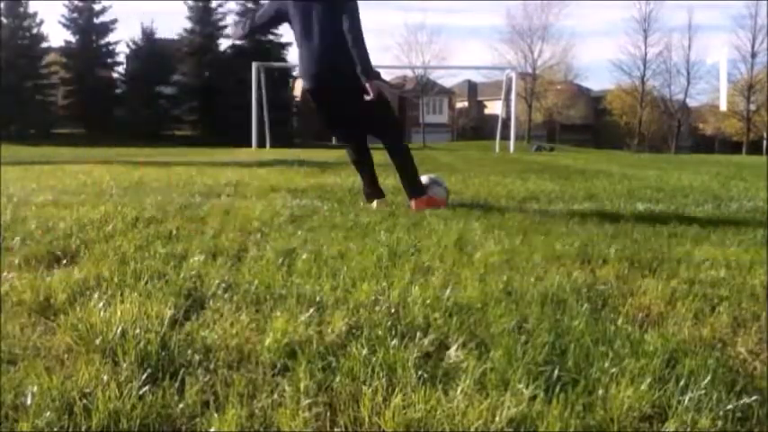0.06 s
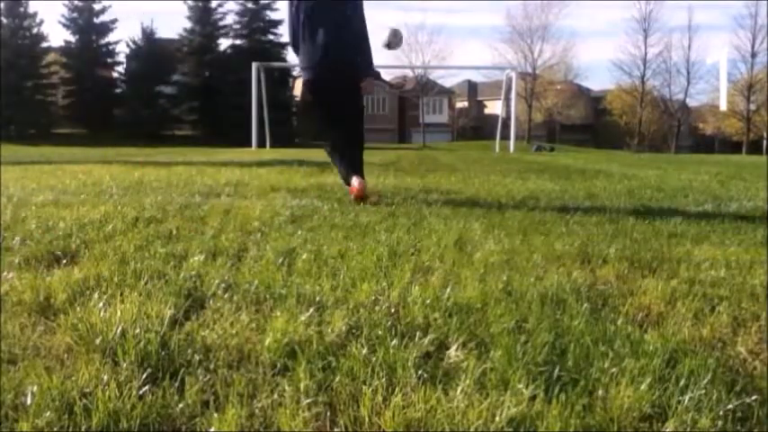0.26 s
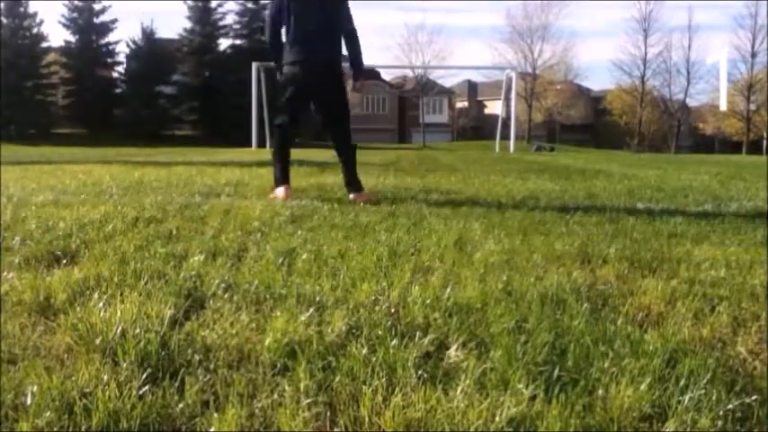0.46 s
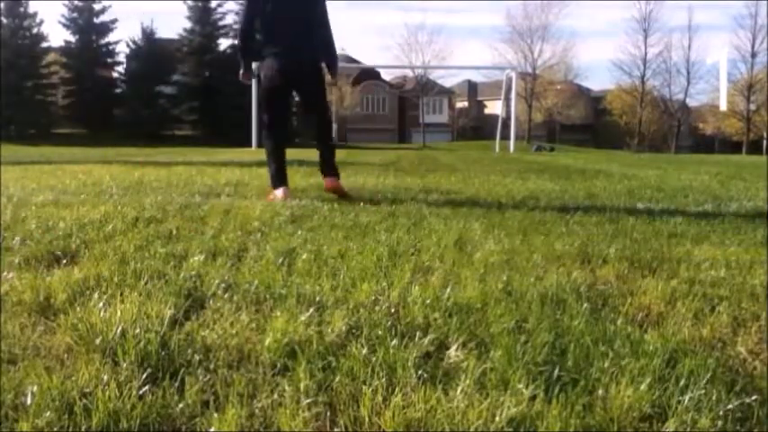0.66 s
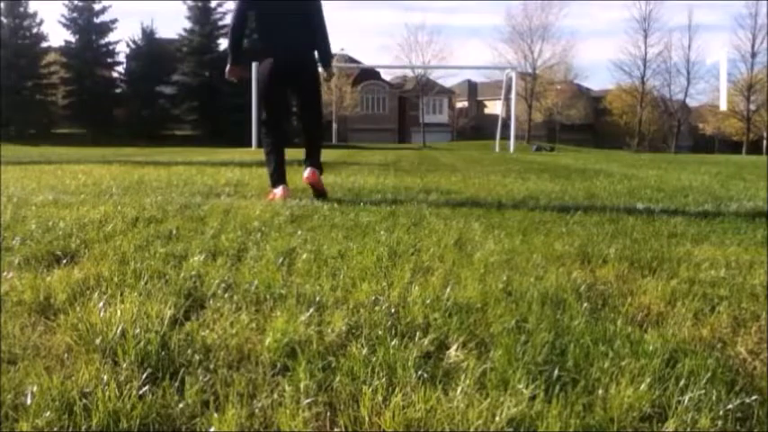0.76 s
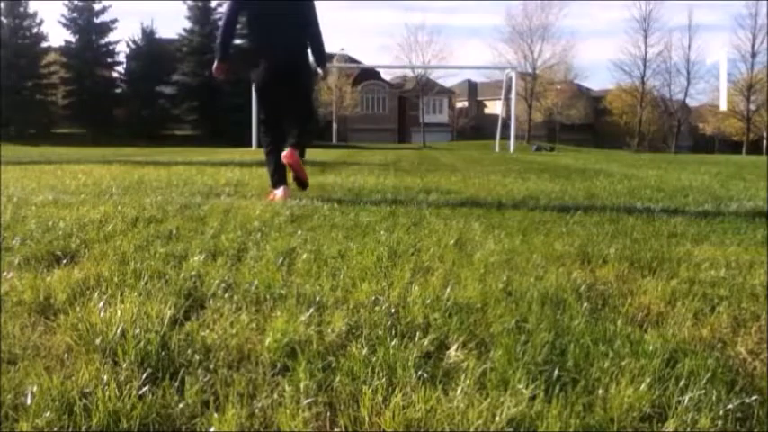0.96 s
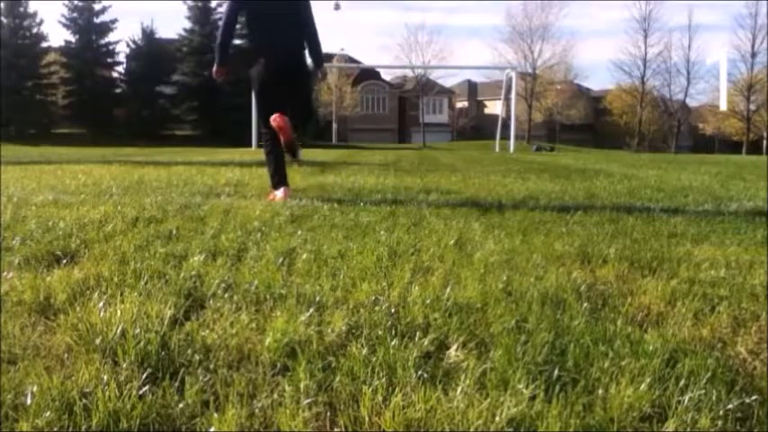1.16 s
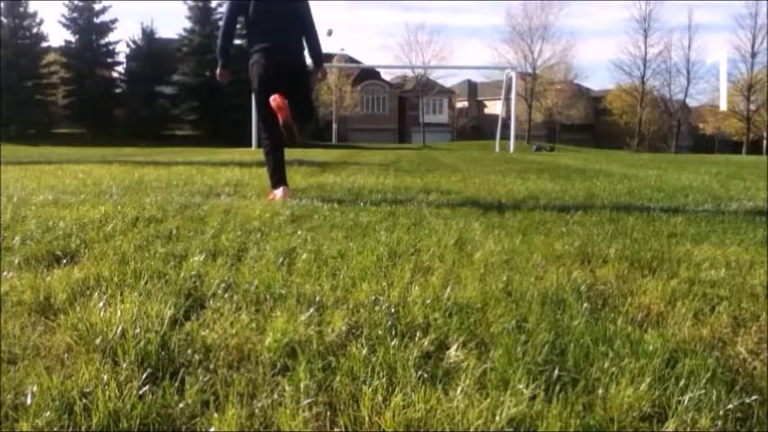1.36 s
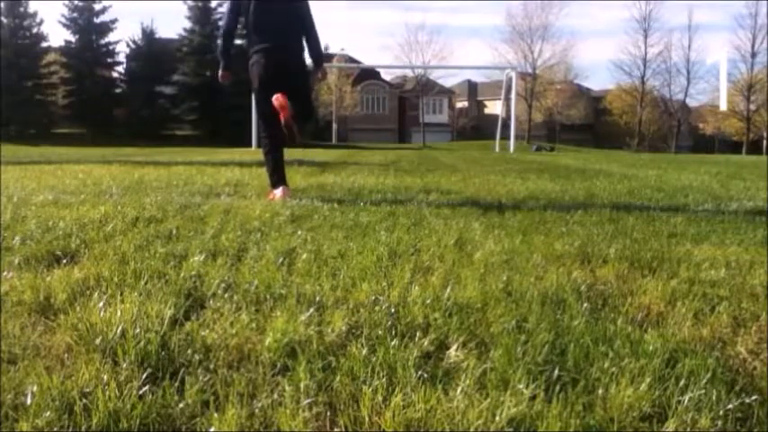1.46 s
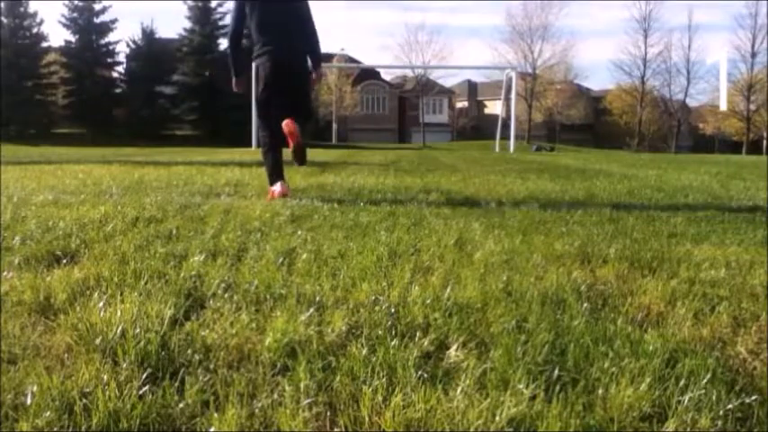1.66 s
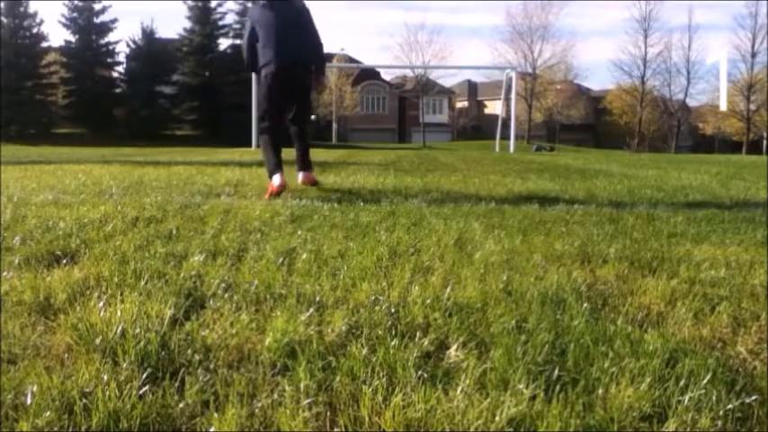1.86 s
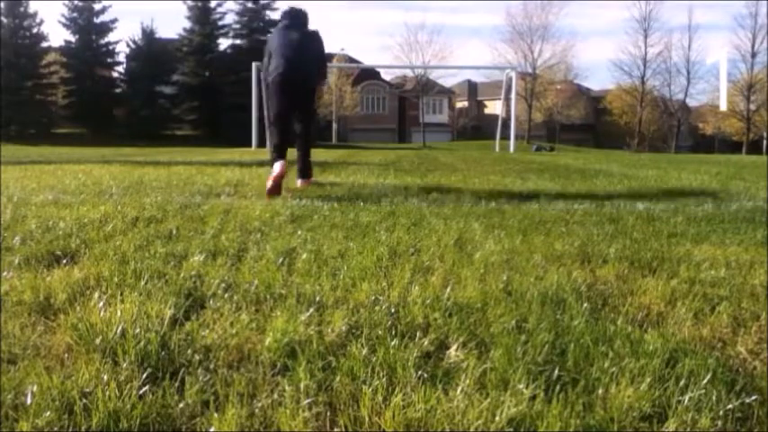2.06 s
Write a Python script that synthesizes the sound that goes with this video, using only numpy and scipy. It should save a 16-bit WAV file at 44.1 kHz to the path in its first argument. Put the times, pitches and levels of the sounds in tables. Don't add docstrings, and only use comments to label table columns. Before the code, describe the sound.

Single hard football kick on an open grassy field, followed by low fluttering wind gusts.

```python
import sys
import numpy as np
from scipy import signal
from scipy.fft import rfft, irfft
from scipy.io import wavfile

SR = 44100
rng = np.random.default_rng(int(sys.argv[2]) if len(sys.argv) > 2 else 0)


def decibels_to_gain(level_db):
    exponent = np.asarray(level_db, float) / 20
    return 10 ** exponent


def store_wav(level_fs):
    pcm = np.round(np.clip(np.atleast_2d(level_fs), -1, 1) * 32767)
    wavfile.write(sys.argv[1], SR, pcm.T.astype(np.int16))


N = 92610

# (start [s], length [s], level [dB], brightness [Hz])
BRUSHES = [
    (-.05, 0.24, -76.5, 10600),
    (0.088, 0.036, -71, 5360),
    (0.1, 0.0087, -63, 5200),
    (0.207, 0.034, -54.5, 2200),
    (0.214, 0.016, -62.5, 7040),
    (0.303, 0.0097, -80, 5900),
    (0.576, 0.048, -68, 3530),
    (0.628, 0.016, -78.5, 3500),
    (2.016, 0.052, -73.5, 2550),
]
# (time [s], level [dB], pitch [Hz])
STALKS = [
    (.1045, -52, 3300),
    (.209, -39, 1200),
    (.582, -53, 1600),
    (.598, -56, 1500),
    (.623, -54, 1600),
    (.646, -52, 2000),
    (1.99, -55, 3300),
    (2.0455, -52, 1600),
]
BLADES_PER_S, STALK_S = 9200, .0015
# (frequency [Hz], density [dB per Hz])
HUSH_SPECTRUM = [(100, -0.5), (250, -2), (500, -6), (1000, -15), (2000, -17.5), (4000, -25.5), (8000, -28),
                 (15000, -32.5)]
HUSH_DB, HUSH_PATCHY_DB = -73, .7
# (end [s], pitch [Hz], level [dB])
ENGINE = (0.27, 487, -70)

# (start [s], length [s], level [dB rms], eddy pitch [Hz])
GUSTS = [(0.023, 0.022, -54, 104), (.05, .05, -64, 100), (0.091, 0.044, -54, 147),
         (0.275, 0.029, -61.5, 115), (0.317, .055, -54.5, 248.8), (.526, 0.023, -58, 170),
         (0.555, 0.041, -51, 150.6), (.705, 0.066, -48, 262.5), (0.787, 0.038, -64.5, 116),
         (0.821, 0.088, -48, 261), (.964, 0.035, -55, 221), (1.003, .02, -54.5, 261),
         (1.035, .05, -50, 240.9), (1.143, 0.055, -57.5, 199), (1.291, 0.034, -59, 100),
         (1.364, 0.047, -56.5, 180), (1.95, 0.045, -64, 119), (0.376, 0.069, -62.5, 130.2)]
# (time [s], peak [dB], pitch [Hz])
POPS = [(0.0682, -39.5, 85), (0.1029, -41.6, 151), (0.1235, -41.5, 109), (0.2084, -40.5, 139),
        (0.328, -45.5, 210), (0.3365, -43, 235), (0.3608, -40, 175), (0.3701, -41, 130), (0.5707, -42, 128),
        (0.6879, -38.5, 108), (0.7073, -43, 83.4), (0.7091, -29.5, 310), (0.718, -31.5, 126),
        (0.732, -37, 210), (0.7445, -38.5, 137), (0.7498, -46.5, 250), (0.7536, -36, 292),
        (0.7655, -45, 126), (0.7802, -39.5, 118), (0.7989, -42.5, 90), (0.8359, -33, 253),
        (0.8426, -35.5, 210), (0.8483, -47.5, 84), (0.8513, -27.5, 165), (0.8573, -34, 195),
        (0.8639, -39, 228), (0.8693, -36, 258), (0.8767, -29, 232), (0.8896, -43, 85), (0.8922, -31, 210),
        (0.9003, -41, 193), (0.9163, -34, 288), (0.9203, -23, 249), (0.9223, -39, 494), (0.9254, -36, 164),
        (0.9324, -41, 92), (0.941, -45, 180), (0.9591, -41, 128), (0.9693, -43, 193), (0.9734, -31, 176),
        (0.9771, -35.5, 84), (0.9825, -33.9, 224), (0.9903, -31, 99), (0.9952, -45, 178),
        (1.0086, -32.5, 430), (1.0115, -26.5, 178), (1.0157, -46.5, 86), (1.0179, -30.5, 240),
        (1.0415, -31.5, 178), (1.0458, -36, 248), (1.0502, -28.5, 120), (1.0567, -42, 246),
        (1.0705, -28.5, 208), (1.0783, -51, 139), (1.0814, -34.5, 298), (1.1563, -42.5, 151),
        (1.1699, -43.6, 138), (1.179, -32.5, 164), (1.1839, -40, 173), (1.4075, -38, 149)]
# (time [s], peak [dB], pitch [Hz])
WISPS = [(0.03, -49.5, 107), (0.171, -49, 170), (.18, -46.5, 148), (0.3242, -45.5, 364), (0.353, -48, 360),
         (.7215, -35.5, 333), (0.7417, -40.5, 295), (.826, -41.5, 372), (0.832, -46, 303),
         (.888, -36.5, 260), (0.912, -44, 382), (.992, -46, 403), (1.15, -45, 196), (1.19, -46, 176),
         (1.195, -50, 178), (1.221, -45.5, 149), (1.232, -49, 239), (1.245, -47.5, 99), (1.261, -50.5, 113),
         (1.365, -54.5, 220), (1.389, -45.5, 235), (1.428, -43.5, 116), (1.552, -50.5, 107),
         (1.566, -50, 123), (1.8476, -38, 159)]
# (time [s], peak [dB], pitch [Hz])
CRACKLES = [(.7075, -41.5, 500), (0.712, -48, 610), (.732, -54, 620), (.756, -51, 560), (.868, -52.5, 555),
            (.8755, -45.5, 470), (0.9189, -35.5, 550), (.9925, -47, 560), (1.018, -48.5, 540),
            (1.046, -58, 500), (1.0676, -47.5, 470), (1.0812, -48.5, 620), (1.177, -51, 436),
            (.337, -52, 550), (.366, -52, 520), (.325, -52.5, 600), (1.844, -48, 330), (0.8504, -39, 396)]
# (time [s], level [dB])
BREEZE = [(0.0, -71), (0.2, -64.5), (0.42, -63.5), (0.55, -60.5), (0.67, -65.5), (0.88, -63.5),
          (1.1, -63.5), (1.32, -66), (1.58, -68.5), (1.8, -67.5), (2.1, -62)]
EDDIES_PER_CYCLE, EDDY_CYCLES, EDDY_SPREAD_OCT, EDDY_SPREAD_DB = 1.05, 0.53, 0.4, 5
EDDY_TILT_DB_PER_OCT, GUST_EDGE_S = -11, .005
BREEZE_HZ, BREEZE_LUMP_DB = 170, 2
RUMBLE_DB, RUMBLE_HZ, MIC_CUT_HZ = -70, 68, 62

# (pitch [Hz], level [dB], t60 [s])
PANELS = [(559, -35, 0.011), (1110, -46.5, 0.0067), (830, -46.5, 0.017), (1428, -43.5, 0.015),
          (1930, -53, .02), (2880, -26.5, 0.0035), (4340, -36, 0.0059), (5010, -37, 0.0057),
          (5820, -42.5, 0.0097), (8000, -44.5, 0.005), (12100, -48, 0.0029)]
# (delay [s], level [dB], highest mode reached [Hz])
SNAPS = [
    (.00019, 0, 16000),
    (.0016, -11, 16000),
    (.0033, 3, 1500),
    (.0146, 3, 700),
]
# (pitch [Hz], level [dB], t60 [s])
FLIGHT = [(3009, -72, 1.2), (3034, -76, .5), (3402, -65, .15), (2286, -64, .2), (4673, -67, .15),
          (2810, -69, .16), (3973, -68, .15)]
# (pitch [Hz], level [dB])
BUZZ = [(1100, -45), (1590, -75), (1850, -50), (2092, -60), (2362, -52), (4102, -62), (4452, -56),
        (5206, -50.5), (5437, -64), (6016, -52), (6190, -63), (6480, -52.5), (6880, -55), (7171, -46)]
KICK_S = .23058
SLAP_DB, SLAP_LEAD_S, SLAP_S = -29, .0001, .0008
SQUASH_HZ, SQUASH_DB, SQUASH_HOLD_S = 114, -26.5, 0.016
BUZZ_S, BUZZ_T60_S, SHAKE_S = .027, .075, .004
PUFF_DB, PUFF_HZ = -49, 2200

# (start [s], length [s], level [dB], start pitch [Hz], end pitch [Hz])
CHIRPS = [
    (0.552, 0.017, -78.5, 3350, 3300),
    (1.111, 0.043, -84, 3350, 3420),
    (1.158, 0.087, -94, 3340, 3550),
    (1.3345, 0.012, -81, 3500, 2490),
    (1.355, 0.016, -79, 2750, 2780),
    (1.372, 0.012, -75, 2820, 3260),
    (1.382, 0.014, -77, 3220, 2500),
]

# (time [s], lost above [Hz], kept strip [Hz], kept strip [Hz])
DROPOUTS = [(.277, 4800, 8800, 9200), (.348, 3300, 5500, 7400), (.615, 4000, 4900, 5500),
            (.852, 3200, 5500, 8100), (1.02, 3600, 5700, 8900), (1.256, 2800, 6300, 8800),
            (1.3, 2300, 4800, 8200), (1.402, 3400, 7500, 4800), (1.576, 4200, 7500, 8300),
            (2.035, 2800, 4500, 5100)]
DROPOUT_S, DROPOUT_DEPTH, STRIP_HZ, STRIP_LIFT = .018, .9, 45, 1.2
SQUASH_CUT_HZ, SQUASH_GAP_HZ, TOP_HZ = 7800, 3250, 15900


def rms_one(x):
    return x / np.sqrt(np.mean(x ** 2) + 1e-20)


def butter(x, hz, kind, order=2):
    return signal.sosfilt(signal.butter(order, hz, kind, fs=SR, output="sos"), x)


def drift(rate_hz):
    r = np.exp(-2 * np.pi * rate_hz / SR)
    return rms_one(signal.lfilter([1], [1, -2 * r, r * r], rng.standard_normal(N + SR))[SR:])


def click(s, db):
    return (np.arange(N) == int(s * SR)) * decibels_to_gain(db) + 1e-18


def ring(x, hz, t60_s):
    r = decibels_to_gain(-60 / (t60_s * SR))
    w = 2 * np.pi * hz / SR
    return signal.lfilter([0, np.sin(w)], [1, -2 * r * np.cos(w), r * r], x)


def gate(start_s, length_s, edge_s):
    t = np.arange(N) / SR
    inside_s = np.minimum(t - start_s, start_s + length_s - t)
    return np.sin(np.pi / 2 * np.clip(inside_s / edge_s + .5, 0, 1)) ** 2


def grass():
    out = np.zeros(N)
    for s, length_s, db, hz in BRUSHES:
        blades = rng.standard_normal(N) * (.5 + 4.4 * (rng.random(N) < BLADES_PER_S / SR))
        swish = rms_one(butter(butter(blades, hz, "low"), 320, "high"))
        out += decibels_to_gain(db) * swish * gate(s, length_s, min(length_s / 2, .03))
    for s, db, hz in STALKS:
        tear = rng.standard_normal(N) * gate(s - STALK_S / 2, STALK_S, STALK_S / 2) * decibels_to_gain(db - 10)
        out += butter(tear + click(s, db + 8), [hz * .5, hz * 1.7], "band")
    return out


def hush():
    out = 0
    edges_hz = 100 * 2 ** np.arange(0, 7.6, .5)
    white = rng.standard_normal((2, N))
    hz, db = np.transpose(HUSH_SPECTRUM)
    for k, (low, high) in enumerate(zip(edges_hz, edges_hz[1:])):
        level_db = np.interp(np.log(low * high) / 2, np.log(hz), db)
        band = butter(white[k % 2], [low, high], "band")
        out = out + decibels_to_gain(level_db + HUSH_PATCHY_DB * drift(8.6)) * band
    return decibels_to_gain(HUSH_DB) * out / np.std(butter(out, 300, "high"))


def engine():
    end_s, hz, db = ENGINE
    return decibels_to_gain(db) * rms_one(ring(rng.standard_normal(N), hz, 0.013)) * gate(-.1, end_s + 0.088, 0.071)


def add_eddy(out, s, db, hz, phase):
    n = np.arange(max(int((s - 2.5 / hz) * SR), 0), min(int((s + 2.5 / hz) * SR), N))
    cycles = (n / SR - s) * hz
    out[n] += decibels_to_gain(db) * np.sin(2 * np.pi * cycles + phase) / (1 + (cycles / EDDY_CYCLES) ** 2) ** 2


def gust(s, length_s, hz):
    out = np.zeros(N)
    draws = np.clip(rng.standard_normal((40, 4)), -1.6, 1.6)
    for k, (late, size, pitch, phase) in enumerate(draws):
        when_s = s + (k + 0.32 * late) / (hz * EDDIES_PER_CYCLE)
        octaves = EDDY_SPREAD_OCT * pitch
        if when_s < s + length_s:
            db = EDDY_SPREAD_DB * size + EDDY_TILT_DB_PER_OCT * octaves
            add_eddy(out, when_s, db, hz * 2 ** octaves, 3 * phase)
    out *= gate(s, length_s, GUST_EDGE_S)
    return out / np.sqrt(np.sum(out ** 2) / (length_s * SR) + 1e-12)


def wind():
    out = np.zeros(N)
    for s, length_s, db, hz in GUSTS:
        out += decibels_to_gain(db) * gust(s, length_s, hz)
    for s, db, hz in list(POPS) + list(WISPS) + list(CRACKLES):
        add_eddy(out, s, db, hz, 0)
    s, db = np.transpose(BREEZE)
    breeze = rms_one(butter(rng.standard_normal(N), BREEZE_HZ, "low", order=3))
    out += breeze * decibels_to_gain(np.interp(np.arange(N) / SR, s, db) + BREEZE_LUMP_DB * drift(4.9))
    rumble = decibels_to_gain(RUMBLE_DB) * rms_one(butter(rng.standard_normal(N), [32, RUMBLE_HZ], "band"))
    return butter(out, MIC_CUT_HZ, "high", order=3) + rumble


def impact():
    t = np.arange(N) / SR - KICK_S
    slap = np.sin(np.pi * np.clip((t + SLAP_LEAD_S) / SLAP_S, 0, 1)) ** 2
    t = np.maximum(t, 0)
    squash = np.sin(2 * np.pi * SQUASH_HZ * t) * np.exp(-(t / SQUASH_HOLD_S) ** 3)
    return decibels_to_gain(SLAP_DB) * slap - decibels_to_gain(SQUASH_DB) * squash


def panels():
    out = np.zeros(N)
    luck_db = rng.normal(0, 1.5, (len(SNAPS), len(PANELS)))
    for k, (hz, db, t60_s) in enumerate(PANELS):
        hits = click(KICK_S, 0)
        for j, (delay_s, snap_db, top_hz) in enumerate(SNAPS):
            if hz < top_hz:
                hits = hits + click(KICK_S + delay_s, snap_db + luck_db[j, k])
        out += decibels_to_gain(db) * ring(hits, hz, t60_s)
    flight = sum(ring(click(KICK_S, db), hz, t60_s) for hz, db, t60_s in FLIGHT)
    return out + flight * gate(KICK_S - .1, .235, .09)


def skin():
    t = np.maximum(np.arange(N) / SR - KICK_S, 0)
    out = np.zeros(N)
    for hz, db in BUZZ:
        shake = rng.standard_normal(N) * gate(KICK_S, SHAKE_S, SHAKE_S / 2) + 1e-18
        mode = ring(shake, hz, BUZZ_T60_S)
        out += decibels_to_gain(db) * mode / abs(mode).max()
    puff = butter(butter(rng.standard_normal(N), PUFF_HZ, "low", order=4), 200, "high")
    out += decibels_to_gain(PUFF_DB - 230 * t) * rms_one(puff)
    return out * gate(KICK_S + .001, BUZZ_S, .006)


def kick():
    return impact() + panels() + skin()


def birds():
    t = np.arange(N) / SR
    out = np.zeros(N)
    for s, length_s, db, start_hz, end_hz in CHIRPS:
        hz = np.interp(t, [s, s + length_s], [start_hz, end_hz])
        out += decibels_to_gain(db + 1.5) * gate(s, length_s, 0.0047) * np.sin(2 * np.pi * np.cumsum(hz) / SR)
    return out


def scene():
    return (grass() + hush() + engine() + wind() + kick() + birds())[None]


def low_pass(x):
    return signal.sosfilt(signal.butter(12, 16460, fs=SR, output="sos"), x)


def record(dry):
    hz = np.arange(N // 2 + 1) * SR / N
    dry = irfft(rfft(dry) * (1 + .15 * (abs(hz - 8000) < 1500)), N)
    out = dry.copy()
    for s, above_hz, *kept_hz in DROPOUTS:
        kept_hz = list(kept_hz) + list(rng.uniform(above_hz, 12000, 4))
        outside = np.all([abs(hz - k) > STRIP_HZ for k in kept_hz], axis=0)
        lost = (hz > above_hz) * np.where(outside, DROPOUT_DEPTH, -STRIP_LIFT)
        piece = irfft(rfft(dry * gate(s - .014, .028, .008)) * lost, N)
        out -= piece * gate(s - DROPOUT_S / 2, DROPOUT_S, .016)
    lost = (hz > SQUASH_CUT_HZ) | (abs(hz - SQUASH_GAP_HZ) < 680)
    after = dry * gate(KICK_S + .0022, .03, .001)
    out -= irfft(rfft(after) * lost, N) * gate(KICK_S + .0022, .023, .002)
    out = signal.sosfilt(signal.cheby2(10, 50, TOP_HZ * 1.04, fs=SR, output="sos"), out)
    return low_pass(out)


dry = scene()
out = record(dry)
store_wav(out)
```